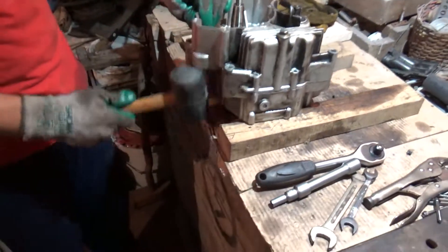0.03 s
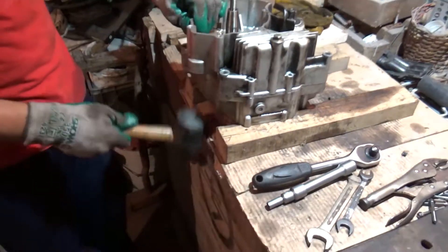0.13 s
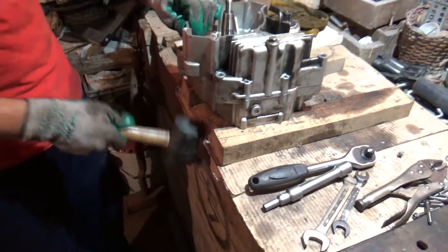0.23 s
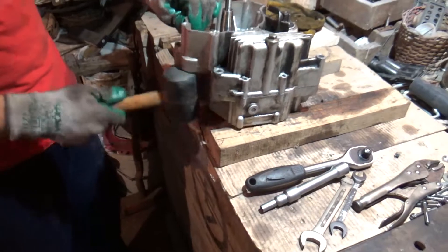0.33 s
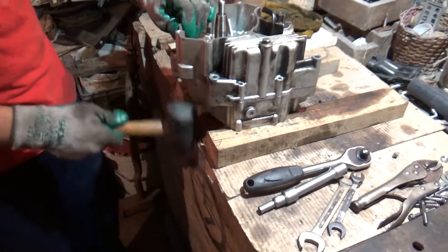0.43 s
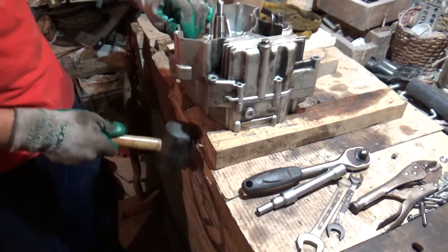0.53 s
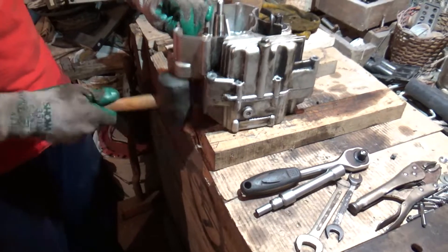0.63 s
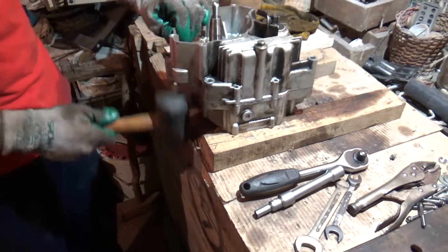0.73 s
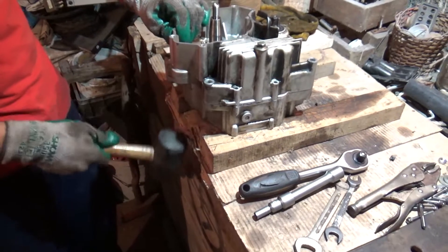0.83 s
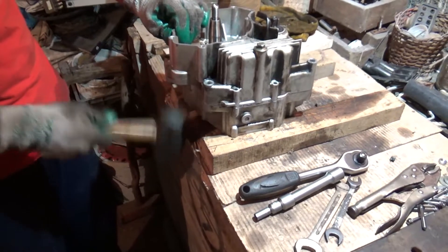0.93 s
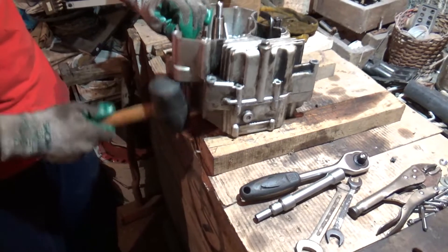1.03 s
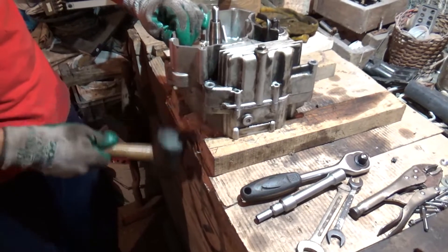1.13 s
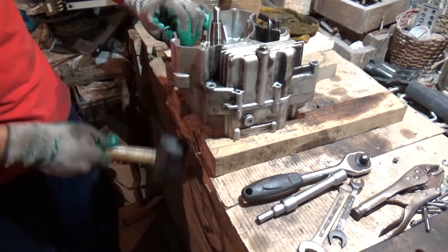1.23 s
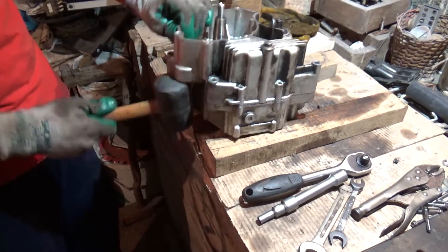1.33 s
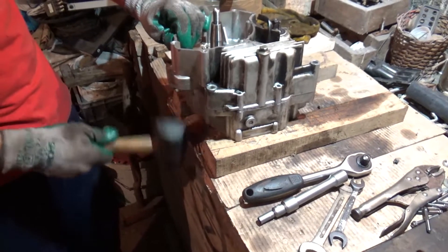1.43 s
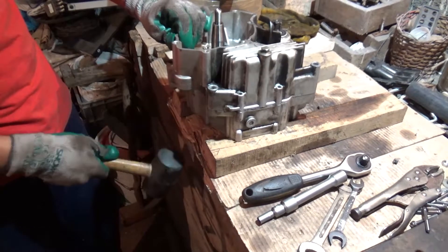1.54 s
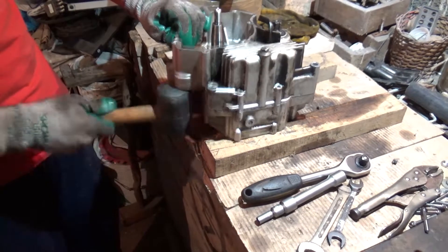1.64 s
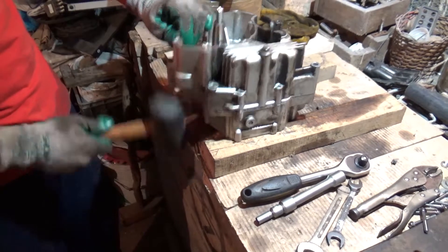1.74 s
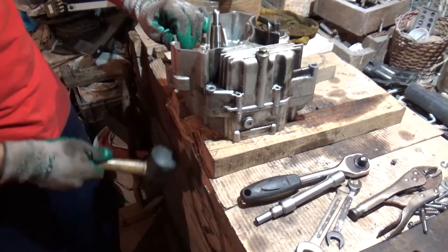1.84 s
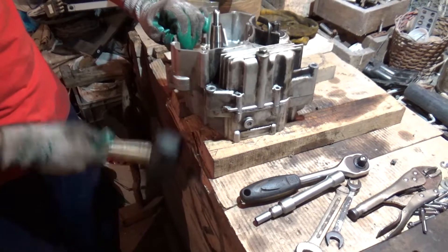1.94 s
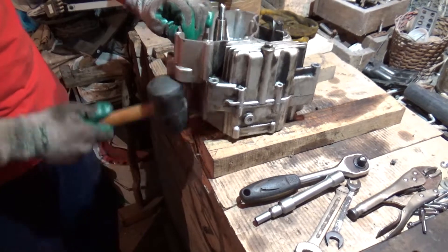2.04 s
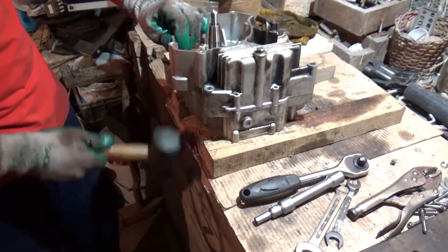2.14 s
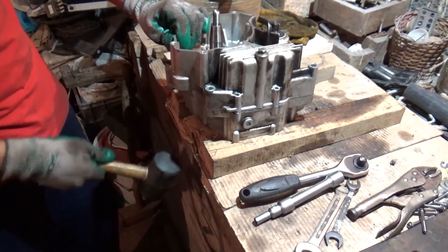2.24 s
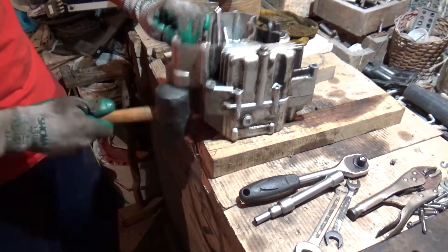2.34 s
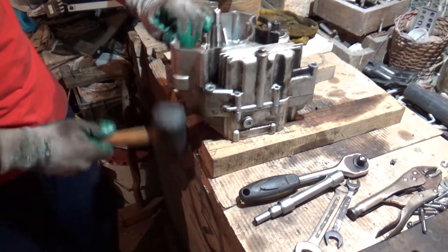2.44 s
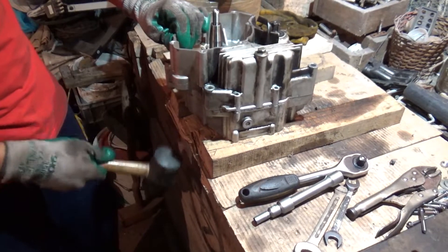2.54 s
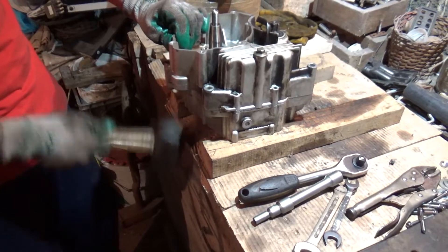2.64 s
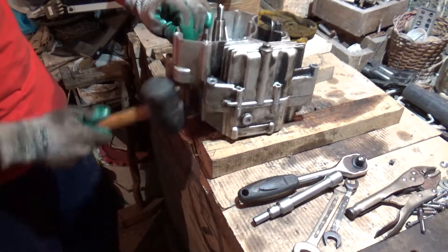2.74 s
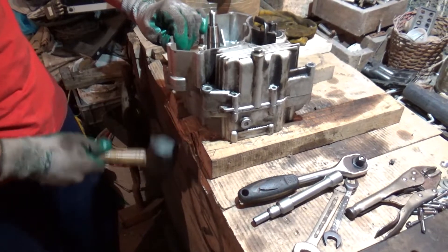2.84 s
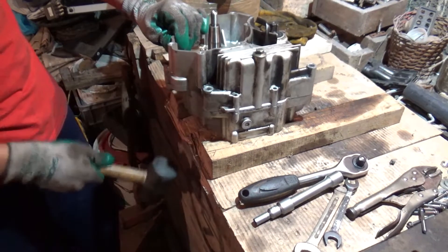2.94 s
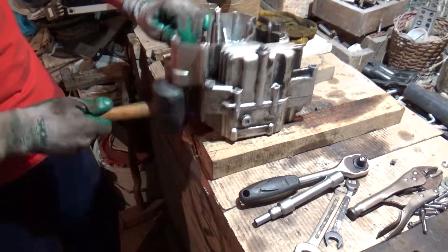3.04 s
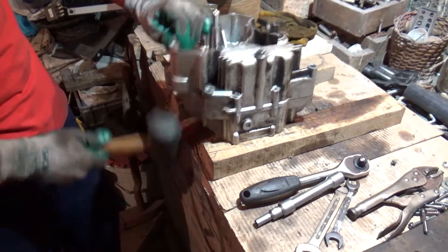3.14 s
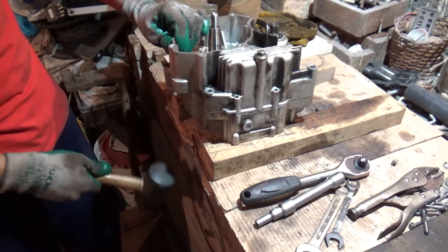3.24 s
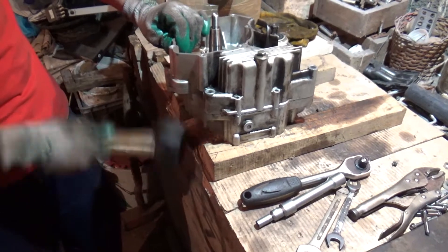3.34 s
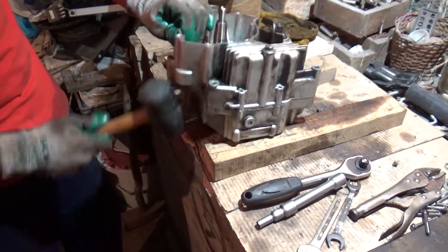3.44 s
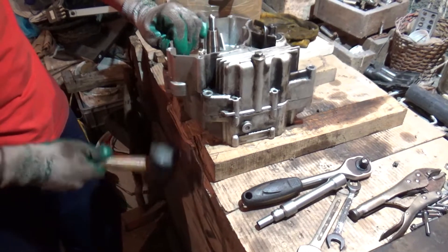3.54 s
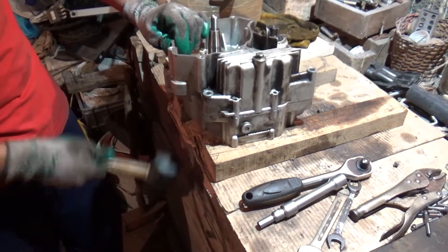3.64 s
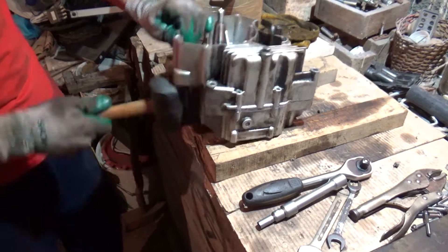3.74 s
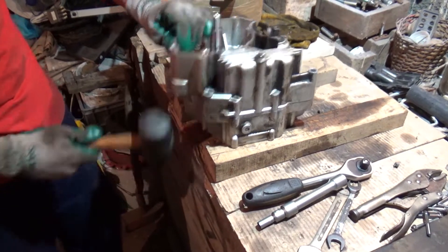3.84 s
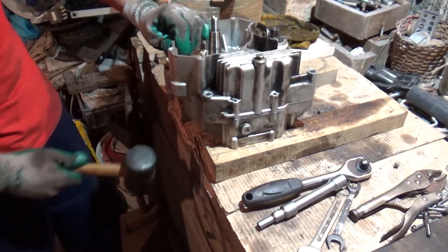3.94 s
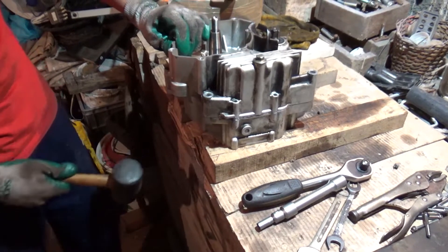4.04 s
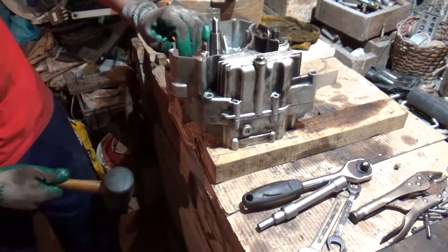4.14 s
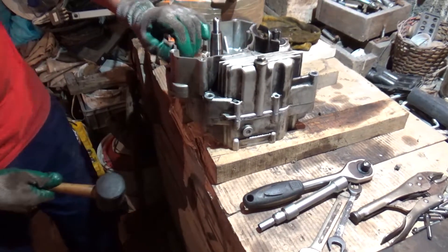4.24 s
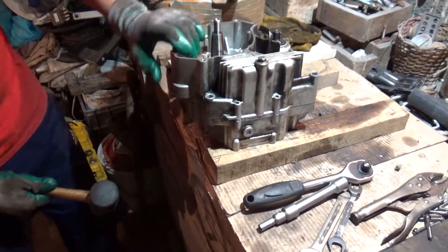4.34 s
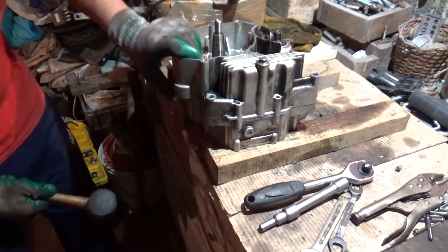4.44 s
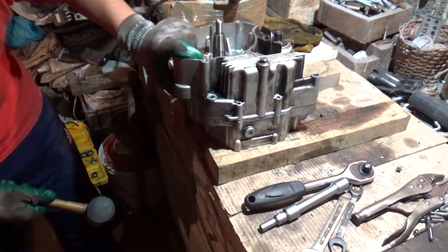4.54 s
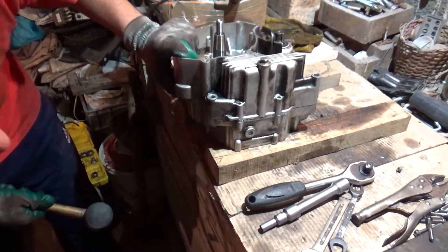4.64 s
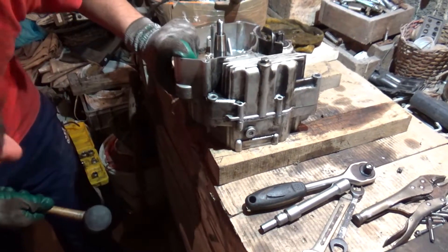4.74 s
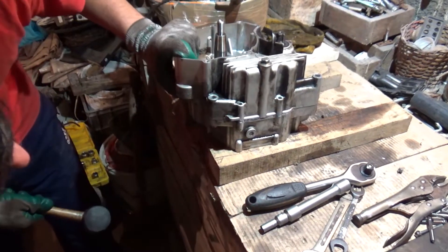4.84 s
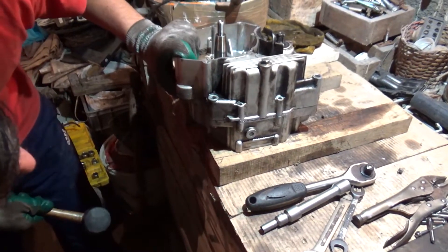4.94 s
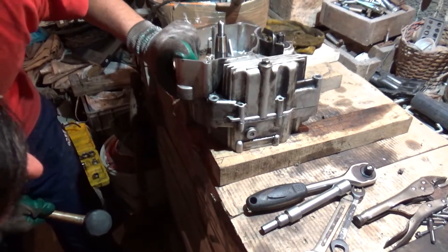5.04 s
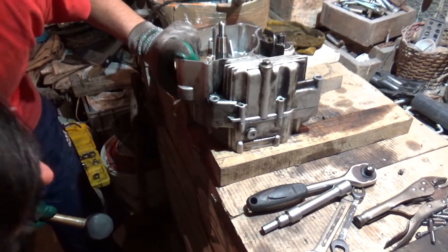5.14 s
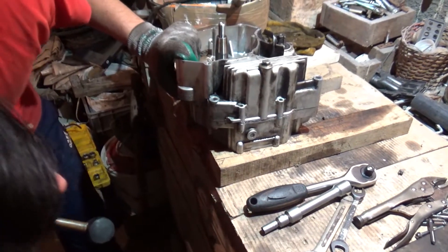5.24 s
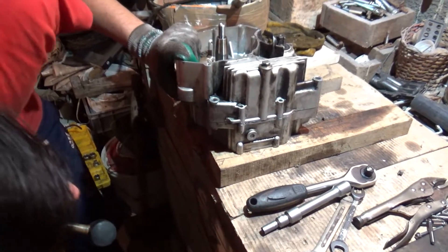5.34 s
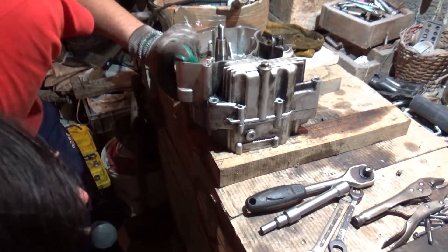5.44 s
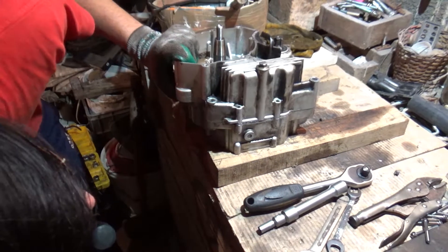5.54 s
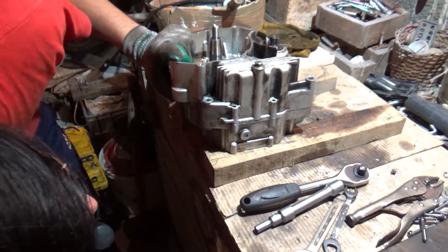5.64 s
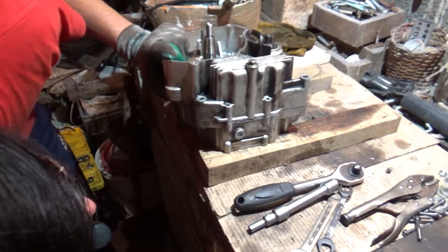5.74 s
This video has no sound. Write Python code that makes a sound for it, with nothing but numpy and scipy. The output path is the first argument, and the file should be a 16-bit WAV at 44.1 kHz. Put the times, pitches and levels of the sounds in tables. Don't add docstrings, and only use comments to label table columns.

```python
import sys
import numpy as np
from scipy import signal
from scipy.io import wavfile
from scipy.ndimage import uniform_filter1d

SR = 44100
rng = np.random.default_rng(int(sys.argv[2]) if len(sys.argv) > 2 else 0)


def unload_wav(signal):
    wavfile.write(
        sys.argv[1],
        SR,
        np.round(np.clip(np.atleast_2d(signal).T, -1, 1) * 32767).astype(np.int16),
    )


def how_loud(loudness_db):
    steps = np.asarray(loudness_db, float) / 20
    return 10 ** steps


N = 255427

# start in seconds, level in dB.
BLOWS = [(0.027, -14.5), (0.355, -16.5), (0.683, -15.5), (1.026, -15.5), (1.363, -13), (1.696, -11.5),
         (2.043, -13), (2.387, -12.5), (2.729, -12), (3.079, -10), (3.424, -13.5), (3.758, -13.5)]
# start in seconds, level in dB.
LANDINGS = [(0.116, -16), (0.449, -17), (0.782, -16), (1.126, -12), (1.466, -12.5), (1.807, -10.5),
            (2.149, -11), (2.494, -11.5), (2.840, -11), (3.200, -11.5), (3.552, -12.5), (3.627, -31),
            (3.905, -11)]
# start in seconds, level in dB, brightness in dB per octave, length factor.
EARLIER_LANDING = [
    (0.0005, -47.5, -4.8, 1.1),
]
# usual level in dB,
# brightness in dB per octave, its change per dB, length factor, its change per dB.
BLOW_RULE = (-17, 1.25, -0.34, 1.49, -0.0049)
LANDING_RULE = (-12.5, 3.5, 0.3943, 0.53, -.015)

# frequency in Hz, density in dB per Hz.
CRACK = [(180, -42), (300, -14.5), (900, -1), (4910, -1.5), (6960, -19.5), (9550, -2.5), (16000, -37.5)]
# frequency in Hz, density in dB per Hz.
CLATTER = [(35, -57.5), (60, -33.5), (189, -29), (371, -8.5), (1090, 4.5), (1250, -3), (2300, -1),
           (3850, -15), (4220, -6.5), (8920, -10.5), (16000, -46.5)]
# frequency in Hz, density in dB per Hz.
THUD = [(35, -49), (60, -41.5), (732, 7.5), (1010, 6), (3940, -12.5), (4530, -25.5), (6280, -37),
        (9790, -37.5), (14900, -57.5), (16000, -60)]
# frequency in Hz, density in dB per Hz.
SETTLE = [(35, -43.5), (70, -12.5), (190, -5), (744, 1.5), (1050, -2), (3250, -13), (3830, -21.5),
          (5200, -24), (8000, -21.5), (10400, -57), (17600, -120)]
# frequency in Hz, t60 in seconds.
CRACK_T60 = [(300, 0.047), (15000, 0.026)]
CLATTER_T60 = [(60, .2), (400, .22), (1500, .2), (5000, .18), (15000, .13)]
THUD_T60 = [(60, .2), (400, 0.03), (1500, 0.025), (5000, 0.016), (15000, .04)]
SETTLE_T60 = [(60, 0.17), (400, 0.7), (1500, 0.38), (5000, 0.5), (15000, .2)]
# frequency in Hz, left-right likeness from 0 to 1.
LIKENESS = [(60, 1), (400, 0.86), (1500, 0.76), (5000, .85), (14000, 0.78)]

# frequency in Hz, level in dB, t60 in seconds.
CASING_MODES = [(92, -22, .3), (125, -24, .25), (250, -16, .2), (2350, -10, .045), (2756, -9, .05),
                (3065, -10, .045), (3310, -8, .055), (352, -5, .1), (422, -4, .15), (615, -6, .08),
                (700, -7, .06), (762, -2, .09), (855, 0, .1), (955, -3, .07), (1045, -4, .065),
                (1122, -2, .09), (1360, -6, .055), (1590, -7, .05), (1805, -5, .065), (4830, -12, .045)]
# delay after landing in seconds, level in dB.
FEET = [
    (.0012, -6.5),
    (.0048, -2.5),
    (.009, -1.5),
    (.018, -6),
]
KNOCK_HZ, KNOCK_DB, KNOCK_OCTAVES = 1250, 9, .75
REBOUND_S, REBOUND_DB = 0.036, -5
BENCH_HZ, BENCH_DB = 150, 5.5
TIMBER_DAMPING = 0.62
LANDING_RISE_S = 0.0018

# start in seconds, level in dB, end-first dB, on-edge dB.
SHORT_DROPS = [(0.0556, -18, 1, -2.5), (0.1431, -18, 1, -3), (0.39, -10, -19.5, -16.5),
               (0.4794, -14, -4.5, -13), (0.7162, -15.5, -7.5, 1), (0.8117, -18, 2, -9.5),
               (1.0593, -16.5, 0.5, -12), (1.1368, -29, -4.5, -7), (1.1614, -16.5, -1, -12.5),
               (1.3969, -18, -1, -4), (1.476, -31.5, -4, -26), (1.502, -17, -2.5, -9.5),
               (1.731, -15, -4.5, -9.5), (1.8449, -11, -2.5, -23.5), (2.0778, -14, -1, -3.5),
               (2.1891, -16, 1, -16), (2.4246, -15, -1.5, -7), (2.506, -28, -6, -9.5),
               (2.5333, -13.5, -7.5, -9), (2.7646, -13, -13, -14.5), (2.8852, -10, -4.5, -11),
               (3.1171, -21, 1, -13.5), (3.2103, -35.5, -1, -2), (3.242, -20, -2.5, -8),
               (3.461, -14.5, 3, -20), (3.5862, -27.5, 0, 4), (3.7966, -20.5, -1, -13),
               (3.9429, -21, -1, 2)]
LONG_DROPS = [(0.1436, -26, -11, -17.5), (0.39, -36, -12, -19.5), (0.4825, -26.5, -8.5, -26),
              (0.8136, -27.5, -12, -22.5), (1.1384, -47, 0, -5.5), (1.166, -34.5, -10, -13.5),
              (1.3992, -31.5, -16.5, -15.5), (1.5034, -29.5, -8, -20.5), (1.733, -33, -9.5, -17.5),
              (1.8501, -27, -1.5, -15), (2.1031, -41, -10, -21), (2.1889, -36.5, 4.5, -15),
              (2.427, -36, -11, -18), (2.536, -25, -8, -26), (2.768, -37, -3.5, -18),
              (2.856, -46, -8.5, 13), (2.8889, -32, 2.5, -1.5), (3.2433, -34, 2, -5),
              (3.587, -24.5, -14, -10.5), (3.9416, -24.5, -9.5, -7.5)]
# frequency in Hz, level in dB, t60 in seconds.
SHORT_SPANNER = [
    [(8790, 0, .068), (8950, -18, .07), (11700, -27, .09)],
    [(9355, 0, .068), (9290, -10, .06), (9460, -12, .06)],
    [(10020, 0, .09), (9950, -7, .08), (10090, -14, .16), (10620, -16, .06)],
    [(13350, 0, .062), (15250, -26, .08)],
    [(13715, 0, .06), (13950, -4, .07)],
]
LONG_SPANNER = [
    [(5838, 0, .09)],
    [(6598, -3, .09)],
    [(5460, -4, .07)],
    [(8040, -4, .09)],
    [(3470, -9, .06)],
]
# level in dB, share of end-first, share of on-edge.
SHORT_ANSWERS = [(-0.5, 0.02, 0), (1.5, 0.67, 0.11), (0, 0.11, 0.88), (-15.5, 0, 0), (-15.5, .4, 0.073)]
LONG_ANSWERS = [(-2.5, 0, 0.0041), (0.5, 1, 0.0085), (-1, 0.92, 0), (1.5, 0.061, 1), (2.5, 0.19, 0.6)]

# start in seconds, level in dB, pitch in Hz, t60 in seconds, noisy share in dB.
TICKS = [
    (0.249, -53.5, 2420, 0.085, 23),
    (0.284, -49, 1060, 0.044, 21.5),
    (0.614, -58, 9000, 0.039, 8.5),
    (1.258, -38, 8000, 0.093, -4.5),
    (1.257, -49.5, 2950, 0.32, -15.5),
    (1.29, -45.5, 4440, 0.077, -0.5),
    (3.668, -39.5, 3940, 0.049, 6),
    (4.091, -46.5, 1700, 0.021, 8.5),
    (4.713, -53, 1730, 0.025, -6),
    (5.500, -51.5, 2664, 0.017, 6),
]
# start in seconds, level in dB.
WASHER = [(0.502, -37), (0.554, -43), (2.255, -29.5), (2.597, -32), (2.612, -37.5), (2.943, -34.5),
          (2.958, -37), (3.305, -36.5), (3.322, -40), (4.018, -53), (4.092, -56)]
WASHER_HZ, WASHER_T60_S, WASHER_PUFF_DB = 3875, .03, -19

# start in seconds, level in dB.
SLIPS = [
    (4.2409, -24),
    (4.2594, -35),
    (4.278, -30),
    (4.2968, -36.5),
    (4.3218, -37),
]
# start in seconds, hold in seconds, level in dB.
STROKES = [
    (4.269, 0.03, -49),
    (4.46, 0.35, -69.5),
    (4.534, 0.0097, -59),
    (4.626, .012, -75),
]
SWELL_DB_S, FADE_DB_S = 330, 225
# time in seconds, level in dB.
SINGING = [
    (4.251, -57),
    (4.4, -78),
    (4.55, -76),
    (4.78, -72),
    (4.9, -79.5),
]
# frequency in Hz, density in dB per Hz.
RUB = [(88, -48.5), (170, -14), (500, -3), (1930, -1), (3770, -4), (9150, -6.5), (14400, -16), (16500, -54)]
# frequency in Hz, density in dB per Hz.
AIR = [(18, -65), (30, -22), (150, -11), (350, -7), (732, -2.5), (1340, -7.5), (1940, -7.5), (3380, -10.5),
       (15200, -17.5), (16500, -25)]
AIR_DB = -65.5
# frequency in Hz, t60 in seconds.
ROOM_T60 = [(100, 0.65), (1000, 0.3), (10000, 0.14)]
ROOM_DB = -21.5

LIMIT_DB, SQUEEZE = -19, 0.71
RELEASE_DB_S, ATTACK_S = 900, .0005
MIC_LOW_HZ, MIC_HIGH_HZ, TOP_HZ = 50, 15300, 16500


def rms_one(x):
    return x / np.sqrt(np.mean(x ** 2) + 1e-20)


def at_hz(points, hz):
    table_hz, values = np.transpose(points)
    return np.interp(np.log(hz), np.log(table_hz), values)


def filtered(x, order, hz, kind):
    return signal.sosfilt(signal.butter(order, hz, kind, fs=SR, output="sos"), x)


def clicks(times, sizes):
    out = np.full(N, 1e-18)
    out[np.round(np.asarray(times) * SR).astype(int)] = sizes
    return out


def dying(times, sizes, t60s, rise_s):
    out = np.zeros(N)
    age = np.arange(2 * SR // 5) / SR
    for s, size, t60 in zip(times, sizes, t60s):
        i = round(s * SR)
        shape = size * (1 - np.exp(-age / rise_s)) * how_loud(-60 * age / t60)
        out[i:i + len(age)] += shape[:N - i]
    return out


def ring(push, hz, t60):
    r = how_loud(-60 / (t60 * SR))
    w = 2 * np.pi * hz / SR
    return signal.lfilter([0, np.sin(w)], [1, -2 * r * np.cos(w), r * r], push)


def bands(source, alike_scale):
    edges = 45 * 2 ** np.arange(0, 8.6, .5)
    for k, (low, high) in enumerate(zip(edges, edges[1:])):
        mid, side = filtered(source[k % 2], 2, [low, high], "band")
        hz = np.sqrt(low * high)
        alike = np.clip(alike_scale * at_hz(LIKENESS, hz), 0, 1)
        yield hz, np.sqrt(1 + alike) * mid + np.sqrt(1 - alike) * side * [[1], [-1]]


def grit(per_s, spread_db):
    size_db = spread_db * np.minimum(rng.exponential(1, (2, 2, N)), 4)
    sizes = how_loud(size_db) * rng.choice([-1, 1], (2, 2, N))
    return rms_one(sizes * (rng.random((2, 2, N)) < per_s / SR))


def by_rule(events, rule):
    s, level_db = np.transpose(events)
    usual_db, bright_db, bright_slope, length, length_slope = rule
    excess_db = level_db - usual_db
    return np.c_[s, level_db, bright_db + bright_slope * excess_db, length + length_slope * excess_db]


def casing():
    blow, land = by_rule(BLOWS, BLOW_RULE), by_rule(LANDINGS, LANDING_RULE)
    contacts = grit(per_s=550, spread_db=7.0)[0, 0]
    chatter = contacts * dying(blow[:, 0], how_loud(blow[:, 1] - 27), 0.16 * blow[:, 3], 0.001)
    rocking = contacts * dying(land[:, 0], how_loud(land[:, 1] - 17.5), 0.058 * land[:, 3], 0.0071)
    metal, bench = 0, 0
    for hz, level_db, t60 in CASING_MODES:
        first, second = how_loud(blow[:, 1] - 6.0 + rng.normal(0, 2.2, (2, len(blow))))
        rebound = clicks(blow[:, 0] + REBOUND_S, how_loud(REBOUND_DB) * second)
        sideways = clicks(blow[:, 0], first) + rebound + chatter
        metal = metal + how_loud(level_db) * ring(sideways, hz, t60)

        knock_db = KNOCK_DB * np.exp(-(np.log2(hz / KNOCK_HZ) / KNOCK_OCTAVES) ** 2)
        push_db = land[:, 1] - 2.5 - 5 * max(np.log2(hz / 1000), 0) + knock_db
        down = rocking * min(hz / 400, 1, 1500 / hz)
        for lag, foot_db in FEET:
            down = down + clicks(land[:, 0] + lag, how_loud(push_db + foot_db) * rng.uniform(-.3, 1, len(land)))
        whole_bench = hz < BENCH_HZ
        bench_t60 = t60 if whole_bench else TIMBER_DAMPING * t60
        bench = bench + how_loud(level_db + BENCH_DB * whole_bench) * ring(down, hz, bench_t60)
    return filtered(metal, 2, 320, "high") + filtered(bench, 1, 200, "high")


def clatter():
    blow, land = by_rule(BLOWS, BLOW_RULE), by_rule(LANDINGS, LANDING_RULE)
    settling = np.r_[land, EARLIER_LANDING]
    layers = ((blow, CRACK, CRACK_T60, 12, 0),   # events, spectrum, decay, lift in dB, extra rise in s
              (blow, CLATTER, CLATTER_T60, 14, 0),
              (land, THUD, THUD_T60, 15, LANDING_RISE_S),
              (settling, SETTLE, SETTLE_T60, -4.5, LANDING_RISE_S))
    out = 0
    for hz, noise in bands(grit(per_s=4300, spread_db=0.5), alike_scale=0.99):
        rise_s = 0.000085 + 0.21 / hz
        shape = 0
        for events, colour, t60s, lift_db, soft_s in layers:
            s, level_db, bright_db, length = np.transpose(events)
            size = how_loud(level_db + lift_db + at_hz(colour, hz) + bright_db * np.log2(hz / 1000))
            t60 = at_hz(t60s, hz) * np.clip(length, .7, 1.15)
            shape = shape + dying(s, size, t60, rise_s + soft_s)
        out = out + shape * noise
    return out


def spanner(drops, families, answers, lift_db):
    s, drop_db, end_db, edge_db = np.transpose(drops)
    buzz, out = grit(per_s=520, spread_db=3.0)[0, 0], 0
    for family, (family_db, end_share, edge_share) in zip(families, answers):
        size = how_loud(drop_db + lift_db + family_db + end_share * end_db + edge_share * edge_db)
        push = clicks(s, size) + how_loud(-34.5) * buzz * dying(s, size, np.full(len(s), .14), 0.001)
        for hz, level_db, t60 in family:
            narrow = signal.butter(1, [hz / 1.05, hz * 1.05], "band", fs=SR)
            once = signal.lfilter(*narrow, ring(push, hz, t60))
            out = out + how_loud(level_db) * signal.lfilter(*narrow, once)
    return out


def ticks():
    out = np.zeros(N)
    bright = filtered(rng.standard_normal(N), 2, [2500, 12000], "band")
    washer = [(*row, WASHER_HZ, WASHER_T60_S, WASHER_PUFF_DB) for row in WASHER]
    for s, level_db, hz, t60, puff_db in list(TICKS) + washer:
        out += ring(clicks([s], how_loud(level_db)), hz, t60)
        out += bright * dying([s], [how_loud(level_db + puff_db)], [1.1 * t60], 0.0029)
    return out


def rustle():
    t = np.arange(N) / SR
    out = 0
    for s, hold, level_db in STROKES:
        swell_db = SWELL_DB_S * np.maximum(s - t, 0)
        fade_db = FADE_DB_S * np.maximum(t - s - hold, 0)
        out = out + how_loud(level_db - swell_db - fade_db)
    return out


def glove():
    contacts = grit(per_s=1000, spread_db=4.0)
    rub = rms_one(sum(how_loud(at_hz(RUB, hz)) * x for hz, x in bands(contacts, alike_scale=1.0)))
    s, level_db = np.transpose(SLIPS)
    jerks = dying(s, how_loud(level_db - 11.5), np.full(len(s), .03), 0.00066)
    return rub * (jerks + rustle())


def air():
    white = rng.standard_normal((2, 2, N))
    hiss = rms_one(sum(how_loud(at_hz(AIR, hz)) * x for hz, x in bands(white, alike_scale=0.48)))
    singing_db = np.interp(np.arange(N) / SR, *np.transpose(SINGING), left=-120, right=-120)
    singing = how_loud(singing_db) * rms_one(ring(white[0, 0], 1140, 0.1))
    return how_loud(AIR_DB) * filtered(hiss, 2, 150, "high") + singing


def workshop(x):
    age, tail = np.arange(SR // 2) / SR, 0
    white = rng.standard_normal((2, len(age)))
    for hz in 90 * 2. ** np.arange(8):
        octave = signal.butter(1, [hz / 2 ** .5, hz * 2 ** .5], "band", fs=SR)
        decay = how_loud(-60 * age / at_hz(ROOM_T60, hz)) * (age > .005)
        tail = tail + signal.lfilter(*octave, white) * decay
    tail = (tail + .5 * tail[::-1]) / np.sqrt(np.sum(tail[0] ** 2))
    return signal.fftconvolve(x[None], tail, axes=1)[:, :N]


def scene():
    bench = casing() * how_loud([[.1], [-.1]]) + clatter() + ticks()
    steel = spanner(SHORT_DROPS, SHORT_SPANNER, SHORT_ANSWERS, lift_db=9.5)
    steel = steel + spanner(LONG_DROPS, LONG_SPANNER, LONG_ANSWERS, lift_db=12.0)
    echoes = workshop(bench.mean(axis=0) + how_loud(-3.0) * steel)
    return bench + steel * how_loud([[-1.4], [1.4]]) + how_loud(ROOM_DB) * echoes + glove() + air()


def band_limit(x):
    return signal.sosfilt(signal.butter(12, 16660, fs=SR, output="sos"), x)


def record(dry):
    power = uniform_filter1d(np.mean(dry ** 2, axis=0), size=128)
    excess_db = np.maximum(10 * np.log10(power + 1e-12) - LIMIT_DB, 0)
    fall_db = RELEASE_DB_S * np.arange(N) / SR
    held_db = np.maximum.accumulate(excess_db + fall_db) - fall_db
    smooth = np.exp(-1 / (ATTACK_S * SR))
    cut_db = SQUEEZE * signal.lfilter([1 - smooth], [1, -smooth], held_db)
    rounded = 0.88 * np.tanh(dry * how_loud(-cut_db) / 0.84)
    thin = filtered(rounded, 3, MIC_LOW_HZ, "high")
    thin = filtered(thin, 4, MIC_HIGH_HZ, "low")
    mix = signal.sosfilt(signal.cheby2(10, 40, TOP_HZ, fs=SR, output="sos"), thin)
    return band_limit(mix)


dry = scene()
out = record(dry)
unload_wav(out)
```